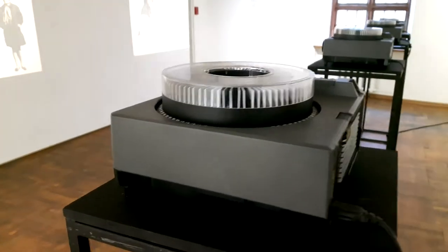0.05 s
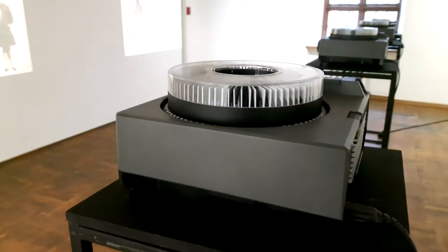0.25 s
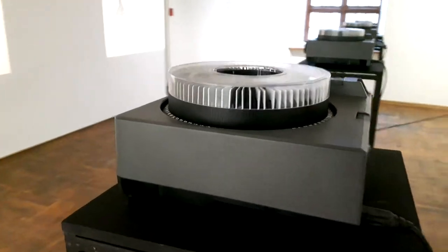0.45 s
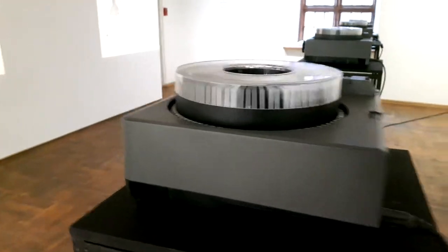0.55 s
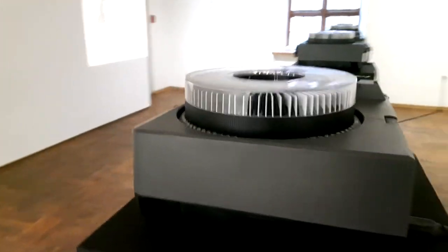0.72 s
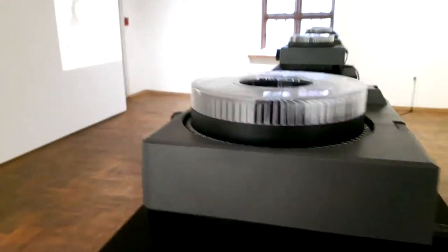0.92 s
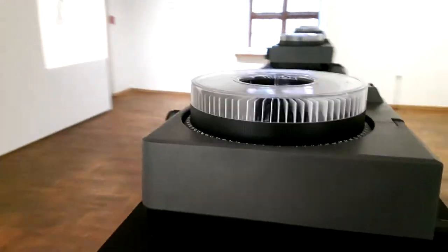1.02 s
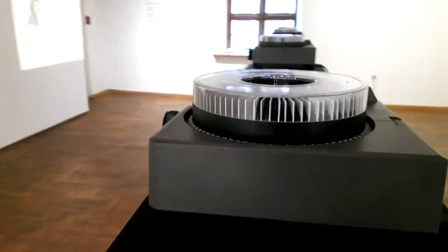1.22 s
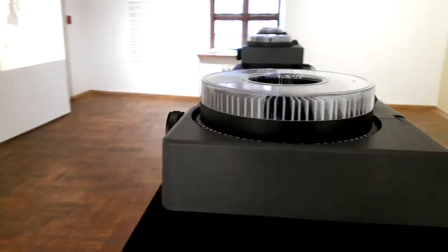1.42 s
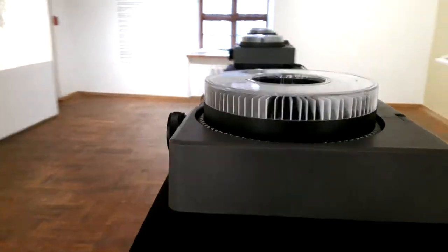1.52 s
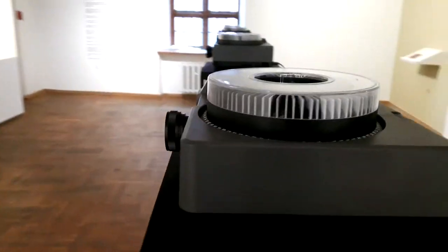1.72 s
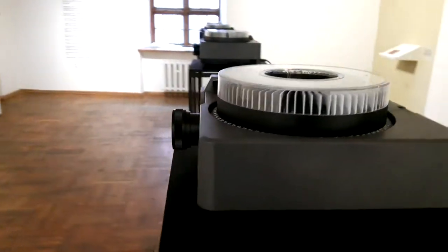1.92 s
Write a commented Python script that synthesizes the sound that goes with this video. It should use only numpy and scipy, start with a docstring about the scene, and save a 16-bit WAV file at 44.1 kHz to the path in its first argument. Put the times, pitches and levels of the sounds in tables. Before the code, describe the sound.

A slide projector clacks as it changes one slide, over its steady fan hum.

```python
"""Slide projector changing a slide.

Levers, tray and slide clack against the housing and set small parts ringing; the tray advance buzzes
briefly at twice the mains frequency. The gear train whirs, the slide scrapes in its guides and the
stand booms softly. A fan rushes and whines throughout. Clacks, buzz and pings echo off bare walls."""
import sys
import numpy as np
from scipy import signal
from scipy.fft import rfft, irfft
from scipy.io import wavfile

SR = 44100
rng = np.random.default_rng(int(sys.argv[2]) if len(sys.argv) > 2 else 0)


def output_pcm(signal):
    """Save a mono or channel-first signal as 16-bit PCM at the path in sys.argv[1].

    Samples are clipped to [-1, 1] before scaling.
    """
    pcm = np.clip(np.atleast_2d(signal).T, -1, 1) * 32767
    wavfile.write(sys.argv[1], SR, np.round(pcm).astype(np.int16))


N = 85995
TIME = np.arange(N) / SR
FREQS = np.fft.rfftfreq(N, 1 / SR)


# Each row: start in seconds, body, clack and tick levels in dB, rise and 60 dB decay in seconds.
CLACKS = [(0.7255, -31.5, -32.5, -33, 0.0015, 0.038), (0.787, -35, -37, -39, 0.0013, 0.077),
          (0.819, -28.5, -33, -34, 0.0025, 0.067), (0.832, -29, -42, -55, 0.0014, 0.063),
          (0.877, -59, -54, -36, 0.0012, 0.016), (0.9412, -32, -35, -35.5, 0.0013, 0.039),
          (0.9775, -23, -25.5, -40, 0.0015, 0.037), (0.9802, -18.5, -22, -20, 0.0033, 0.026),
          (0.9865, -21.5, -28, -30, 0.0017, 0.11), (1.000, -20.5, -37.5, -28, 0.003, 0.031),
          (1.0528, -20, -20, -23, 0.0027, 0.013), (1.0548, -20, -24, -25.5, 0.0021, 0.066),
          (1.081, -28, -49, -52, 0.0018, .04), (1.089, -36, -50, -52, .002, 0.032),
          (1.185, -29.5, -29, -34, 0.002, 0.1), (1.196, -26, -35, -31.5, 0.0016, 0.059),
          (1.214, -43, -42, -37, 0.00115, 0.028), (1.440, -42, -47, -46.5, 0.0013, .025),
          (1.456, -36, -52, -51, .002, 0.025), (1.504, -34.5, -40.5, -38, 0.0015, 0.037),
          (1.516, -52, -47, -45, 0.0015, 0.05), (1.5545, -36, -43.5, -54, .003, 0.034),
          (1.6048, -24.5, -36, -31, 0.0015, 0.011), (1.609, -31, -36, -50.5, 0.0017, 0.049)]

def clacks():
    """Levers, tray and slide strike the housing."""
    return strike(CLACKS)


def strike(blows, contacts_per_s=1500, contact_share=0.32):
    """Each blow is a dying rattle of tiny contacts that rings the housing."""
    out = np.zeros(N)
    for band, response in enumerate(housing_bands()):
        contacts = unit(rng.choice([-1, 1], N) * (rng.random(N) < contacts_per_s / SR))
        rattle = np.sqrt(contact_share) * contacts + np.sqrt(1 - contact_share) * rng.standard_normal(N)
        stretch = 1.26 if band == 0 else 1  # the body band decays more slowly
        power = sum((amp(band_db[band]) * blow(start_s, rise_s, decay_s * stretch)) ** 2
                    for start_s, *band_db, rise_s, decay_s in blows)
        out += signal.fftconvolve(rattle * np.sqrt(power), response)[:N]
    return out


# Housing spectrum. Each row: frequency in Hz, relative level in dB.
HOUSING_SPECTRUM = [(60, -48), (200, -12), (370, -4.5), (520, -11), (720, -7), (1050, -0.5), (1400, -8),
                    (1900, -1), (2450, -1), (2950, -7.5), (5000, -9), (7800, -10), (10000, -10.5),
                    (12000, -17), (14000, -33), (16000, -27)]
# Housing and tray resonances. Each row: centre in Hz, width in Hz, lift in dB.
RESONANCES = [(397, 40, 1.5), (649, 75, 10.5), (761, 33, 9.5), (983, 110, 2.5), (2120, 69, 1),
              (2505, 59, 4), (3638.5, 86, 10.5), (4950, 276, 3.5), (7260, 200, 2), (9780, 200, 4.5),
              (10150, 260, 2), (13300, 270, 2.5)]

def housing_bands(body_edge_hz=2730, tick_edge_hz=8450):
    """Impulse responses of the housing in three bands: low body, middle clack, high tick."""
    lift_db = sum(db / (1 + (2 * (FREQS - hz) / width_hz) ** 2) for hz, width_hz, db in RESONANCES)
    gain = amp(spectrum(HOUSING_SPECTRUM) + lift_db)
    body = 1 / (1 + (FREQS / body_edge_hz) ** 12)
    below_tick = 1 / (1 + (FREQS / tick_edge_hz) ** 12)
    return [minimum_phase(gain * band) for band in (body, (1 - body) * below_tick, 1 - below_tick)]


# Each row: start in seconds, pitch in Hz, level in dB, 60 dB decay in seconds.
PINGS = [(0.244, 1280, -38, 0.098), (0.512, 199.6, -38.5, 0.06), (0.704, 2050, -35.5, 0.033),
         (0.727, 3650, -37.5, .04), (0.73, 1153, -29.5, 0.1), (0.735, 13300, -47.5, .025),
         (0.8209, 11660, -33.5, .04), (0.8215, 13250, -39.5, 0.041), (0.877, 11800, -42, 0.034),
         (0.942, 3680, -25, 0.012), (0.9407, 4950, -33.5, 0.025), (0.944, 750, -34, .05),
         (0.98, 340, -26.5, 0.068), (0.981, 790, -20, 0.047), (1.055, 1088, -21, 0.048),
         (1.184, 4580, -28.5, 0.016), (1.185, 10100, -30, 0.073), (1.186, 13300, -39, 0.068),
         (1.197, 715, -33, 0.093), (1.5035, 11050, -39.5, 0.034), (1.5057, 13100, -45.5, .04),
         (1.605, 9260, -33, 0.018), (1.608, 3575, -39.5, 0.033), (1.607, 4730, -39, 0.027)]

def pings(rise_s=0.001):
    """Catches, springs and panels ring briefly, their pitch unsteady as they rattle."""
    out = np.zeros(N)
    for start_s, hz, db, decay_s in PINGS:
        ring = tone(hz, wander_hz=109.8 + 0.01236 * hz, rate_hz=400)
        out += amp(db) * blow(start_s, rise_s, decay_s) * ring
    return out


# Body, clack and tick levels of one buzz pulse in dB.
BUZZ_DB = (-27, -39, -40)

def buzz(start_s=1.0105, end_s=1.086, pulse_hz=100, rise_s=0.0012, decay_s=0.062):
    """The tray advance chatters at twice the mains frequency, with a rasp in the upper mids."""
    pulse_times = np.arange(start_s, end_s, 1 / pulse_hz)
    chatter = strike([(at_s, *BUZZ_DB, rise_s, decay_s) for at_s in pulse_times])
    rasp = signal.lfilter(*signal.iirpeak(w0=2270, Q=1.3, fs=SR), chatter)
    return chatter + amp(-6.5) * rasp


# Each row: time in seconds, level in dB.
DRIVE_LEVEL = [(0, -66), (.2, -48), (.24, -44), (.45, -43), (.52, -35), (.6, -35), (.68, -39), (.8, -37.5),
               (.92, -42), (1.15, -37), (1.35, -45.5), (1.6, -44), (1.72, -47.5), (1.95, -85)]
# Each row: frequency in Hz, relative level in dB.
DRIVE_SPECTRUM = [(60, -68), (200, -9), (400, 2), (800, 0.5), (1400, -6.5), (2200, -4.5), (3200, -11),
                  (6000, -24.5), (10000, -33), (16000, -51)]

def drive():
    """The gear train whirs, swelling and fading over the slide change."""
    return level(DRIVE_LEVEL) * noise(DRIVE_SPECTRUM)


# Each row: time in seconds, level in dB.
SCRAPE_LEVEL = [(0, -90), (.21, -80), (.24, -56), (.305, -65.5), (.325, -52.5), (.372, -54), (.38, -40.5),
                (.42, -41.5), (.46, -45), (.51, -44.5), (.6, -49.5), (.66, -51), (.71, -43), (.76, -48.5),
                (.86, -54), (.95, -57.5), (1.16, -43), (1.24, -49.5), (1.33, -56.5), (1.95, -70.5)]
# Each row: frequency in Hz, relative level in dB.
SCRAPE_SPECTRUM = [(100, -40), (1500, 2), (3500, 1.5), (5600, 2), (7800, -6), (9500, 2), (11200, -2.5),
                   (12300, -9), (16000, -23)]

def scrape(grain_db=1):
    """Grainy friction of the slide mount and lifter in their guides."""
    friction = noise(SCRAPE_SPECTRUM) * amp(grain_db * drift(rate_hz=170))
    return level(SCRAPE_LEVEL) * unit(friction)


# Each row: start in seconds, level in dB.
THUMPS = [(0.499, -42), (0.982, -44), (1.056, -41), (1.165, -39.5)]
# Each row: frequency in Hz, relative level in dB.
STAND_SPECTRUM = [(40, -35), (90, -13), (140, 0.5), (190, -3.5), (300, -31), (1000, -70)]

def thumps(rise_s=0.014, decay_s=0.37):
    """The stand booms softly when the mechanism takes up or drops its load."""
    power = sum((amp(db) * blow(start_s, rise_s, decay_s)) ** 2 for start_s, db in THUMPS)
    return np.sqrt(power) * noise(STAND_SPECTRUM)


# Motor and fan tones. Each row: pitch in Hz, level in dB, rms wander in Hz.
HUM_TONES = [(99.8, -60.5, 0.89), (147.2, -56.5, 3.8), (194, -56, 2.5), (324.7, -55, 5.17),
             (371, -54.5, 6.64)]
# Each row: time in seconds, level in dB.
WHINE_LEVEL = [(0, -49), (.3, -46), (.5, -56.5), (.78, -46), (.83, -42.5), (1.0, -38), (1.2, -48.5),
               (1.26, -41.5), (1.6, -43), (1.8, -48), (1.95, -48.5)]
# Each row: frequency in Hz, relative level in dB.
AIR_SPECTRUM = [(25, -16.5), (42, -15), (55, -22.5), (80, -12), (130, -8), (260, -4), (400, -4),
                (600, -11.5), (850, -9), (1300, -14), (1750, -16), (3200, -28), (3700, -26), (7000, -40),
                (9600, -41), (12000, -52), (16000, -52)]

def fan(air_db=-39, whine_hz=963.8, flutter_db=2.5):
    """Rushing air, low motor tones and a fluttering blade whine."""
    hum = sum(amp(db) * tone(hz, wander_hz) for hz, db, wander_hz in HUM_TONES)
    whine = unit(tone(whine_hz, wander_hz=3.7) * amp(flutter_db * drift(rate_hz=68)))
    return amp(air_db) * noise(AIR_SPECTRUM) + hum + level(WHINE_LEVEL) * whine


# Each row: frequency in Hz, reverberation time in seconds.
ROOM_T60_S = [(150, 2), (1000, 1.1), (3000, 1.5), (6000, 0.5), (10000, 0.6), (16000, .55)]
# Each row: frequency in Hz, echo level against the direct sound in dB.
ROOM_DB = [(150, 2.5), (700, -4.5), (2000, -9.5), (4500, -9.5), (10000, -14), (16000, -12)]

def room(x, fade_in_s=0.004):
    """Diffuse echo of bare walls; the treble dies first."""
    hz, t, bins = signal.stft(rng.standard_normal(N), SR, nperseg=256)
    decay_per_s = np.log(1000) / spectrum(ROOM_T60_S, hz)[:, None]
    gain = amp(spectrum(ROOM_DB, hz))[:, None] * np.sqrt(2 * decay_per_s / SR)
    tail = signal.istft(bins * gain * np.exp(-decay_per_s * t), SR, nperseg=256)[1][:N]
    return signal.fftconvolve(x, tail * np.minimum(TIME / fade_in_s, 1))[:N]


def amp(db):
    """Decibels to gain."""
    return 10 ** (np.asarray(db) / 20)


def unit(x):
    """Scales to rms 1."""
    return x / np.sqrt(np.mean(x ** 2) + 1e-20)


def spectrum(points, hz=FREQS):
    """Interpolates (Hz, value) points on a log-frequency axis."""
    point_hz, values = np.transpose(points)
    return np.interp(np.log(hz + 1), np.log(point_hz + 1), values)


def level(points):
    """Gain over time from (s, dB) points."""
    return amp(np.interp(TIME, *np.transpose(points)))


def noise(points):
    """Noise shaped by (Hz, dB) points, rms 1."""
    return unit(irfft(rfft(rng.standard_normal(N)) * amp(spectrum(points)), N))


def drift(rate_hz):
    """Random motion rolling off above rate_hz, rms 1."""
    lowpass = np.exp(-(FREQS / rate_hz) ** 2) * (FREQS > 0)
    return unit(irfft(rfft(rng.standard_normal(N)) * lowpass, N))


def tone(hz, wander_hz, rate_hz=14):
    """A wavering sine, rms 1."""
    pitch_hz = hz + wander_hz * drift(rate_hz)
    return unit(np.sin(2 * np.pi * np.cumsum(pitch_hz) / SR))


def blow(start_s, rise_s, decay_s):
    """Envelope: linear rise, then a fall of 60 dB per decay_s."""
    age_s = np.maximum(TIME - start_s, 0)
    fall = np.exp(-np.log(1000) * np.maximum(age_s - rise_s, 0) / decay_s)
    return np.minimum(age_s / rise_s, 1) * fall


def minimum_phase(gain):
    """Impulse response of energy 1 with the given spectral shape and no ringing before the hit."""
    log_gain = np.log(np.maximum(gain / gain.max(), 1e-5))
    cepstrum = irfft(log_gain, N) * 2 * (np.arange(N) < N // 2)
    cepstrum[0] /= 2
    response = irfft(np.exp(rfft(cepstrum)), N)[:4096]
    return response / np.linalg.norm(response)


def scene():
    """The mechanism and its echo over the running fan, in mono."""
    knocks = clacks() + buzz()
    ringing = pings()
    echo = room(knocks + amp(-0.5) * ringing)
    return (knocks + ringing + echo + thumps() + fan() + drive() + scrape())[None]


def record(dry, low_cut_hz=55, ceiling=0.42, high_cut_hz=15820):
    """Microphone low cut, soft ceiling on the peaks, then a band limit."""
    low_cut = signal.butter(4, low_cut_hz, btype="high", fs=SR, output="sos")
    filtered = signal.sosfilt(low_cut, dry)
    limited = filtered / (1 + (abs(filtered) / ceiling) ** 4) ** (1 / 4)
    high_cut = signal.firwin(601, high_cut_hz, window=("kaiser", 9), fs=SR)
    return signal.oaconvolve(limited, high_cut[None], "same")


dry = scene()
out = record(dry)
output_pcm(out)
```